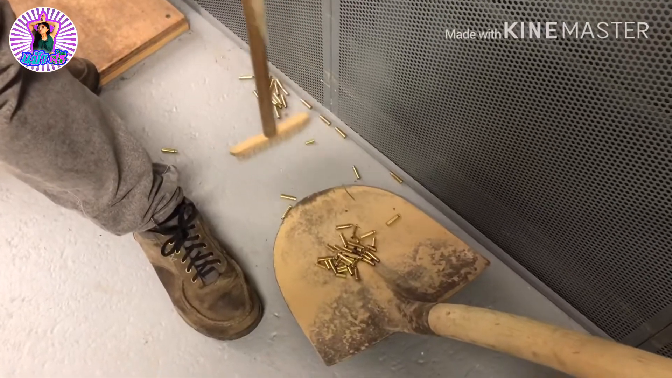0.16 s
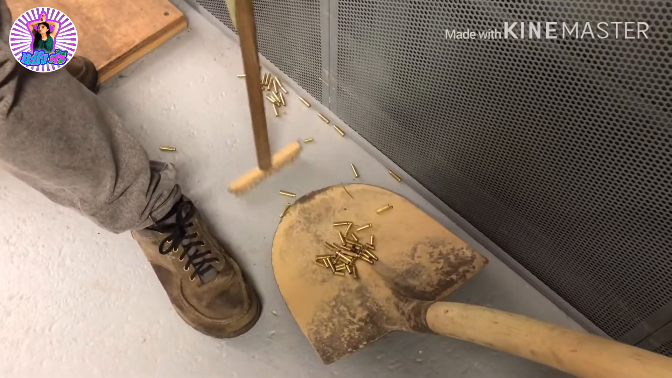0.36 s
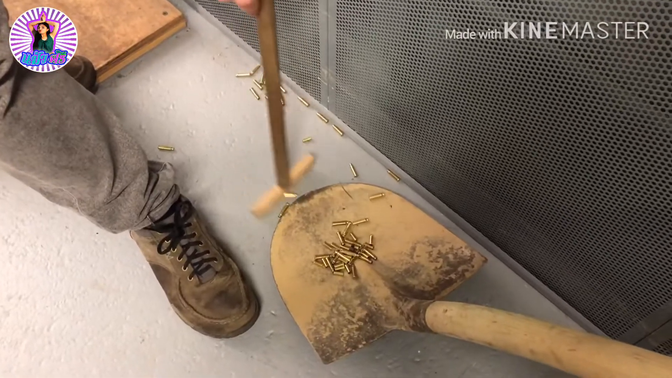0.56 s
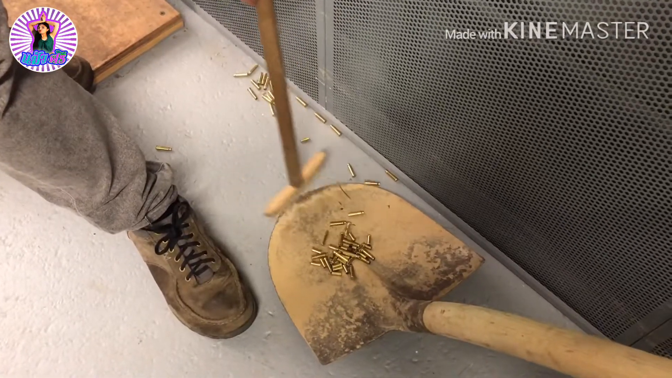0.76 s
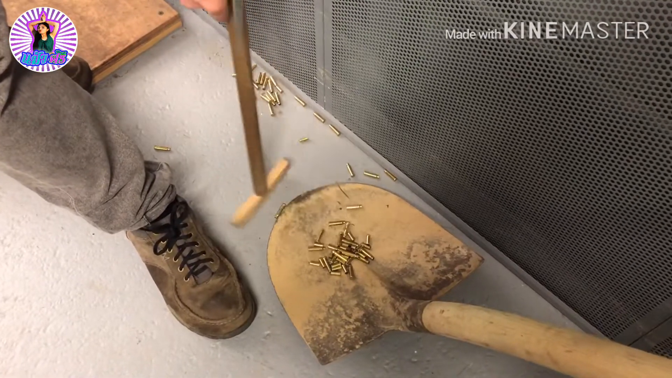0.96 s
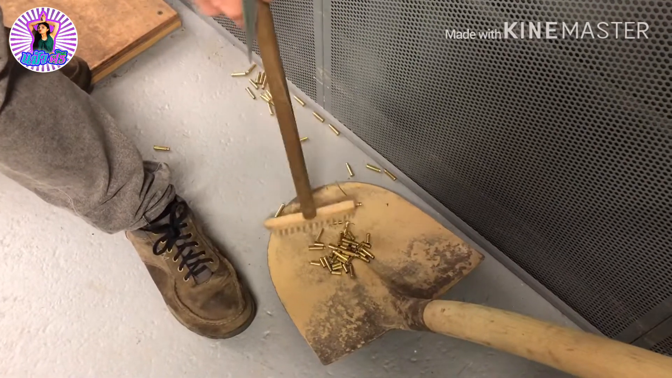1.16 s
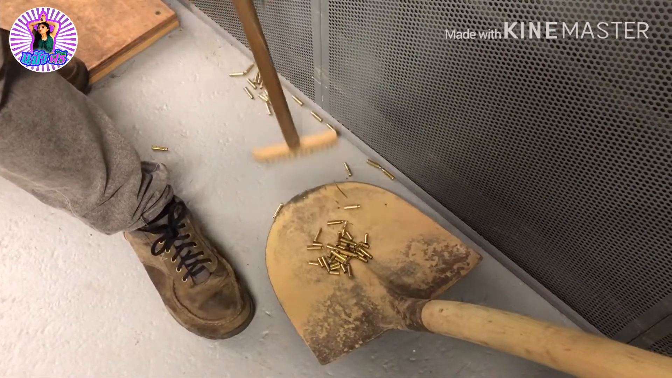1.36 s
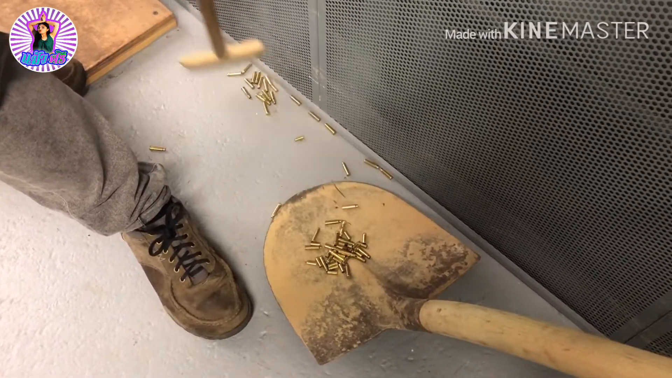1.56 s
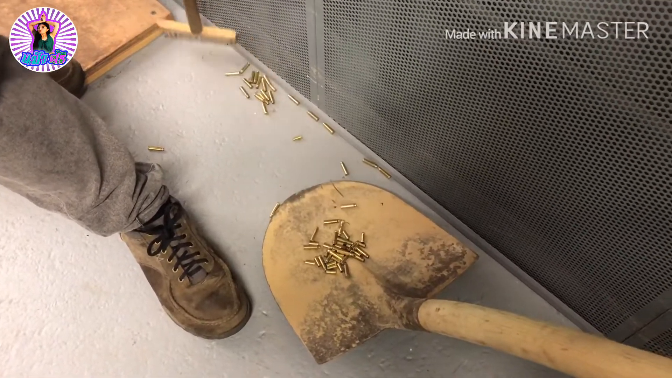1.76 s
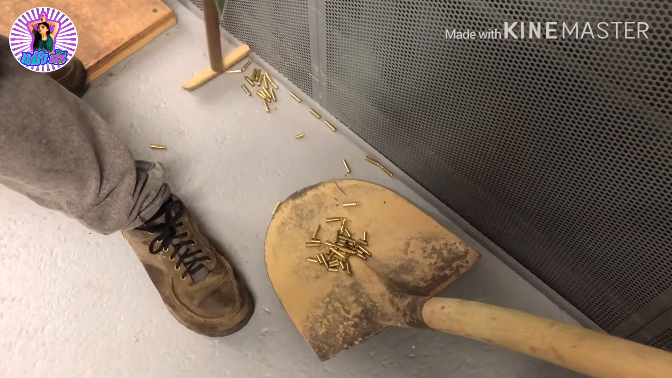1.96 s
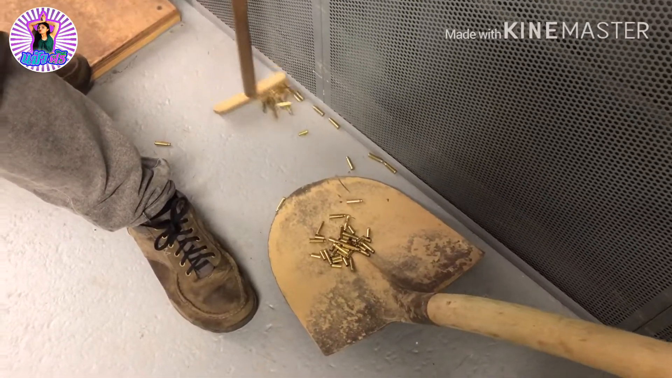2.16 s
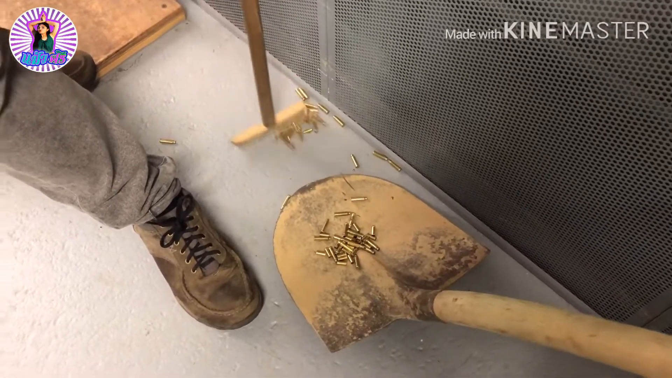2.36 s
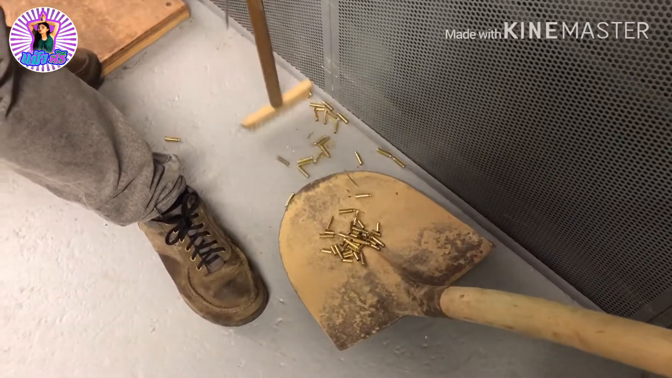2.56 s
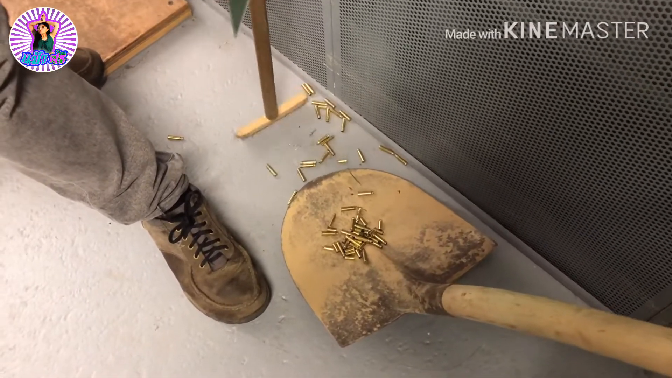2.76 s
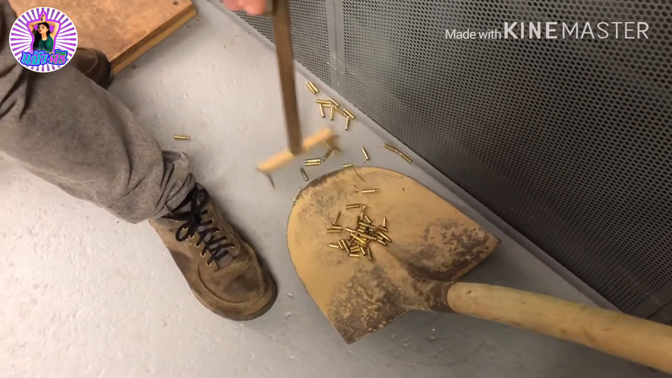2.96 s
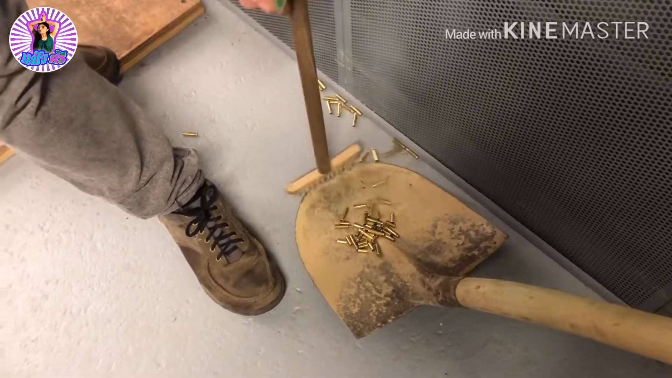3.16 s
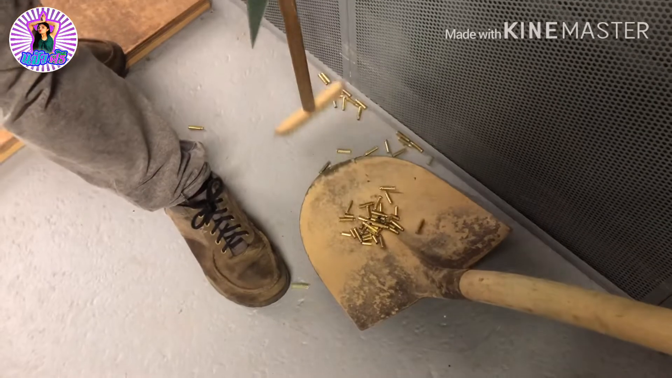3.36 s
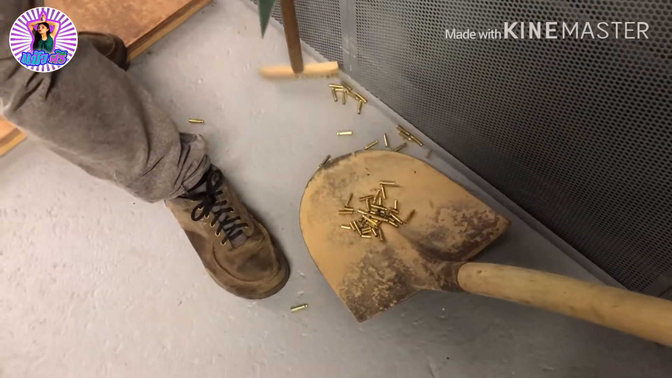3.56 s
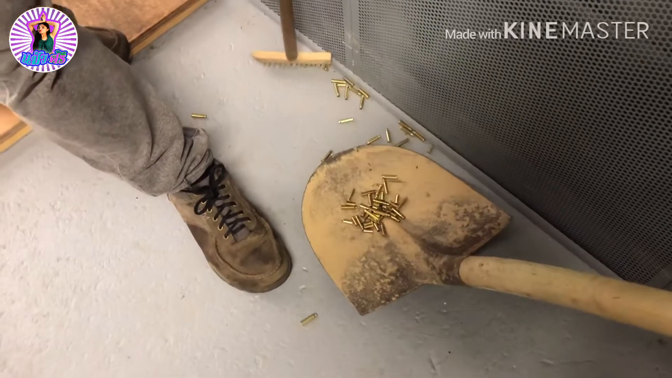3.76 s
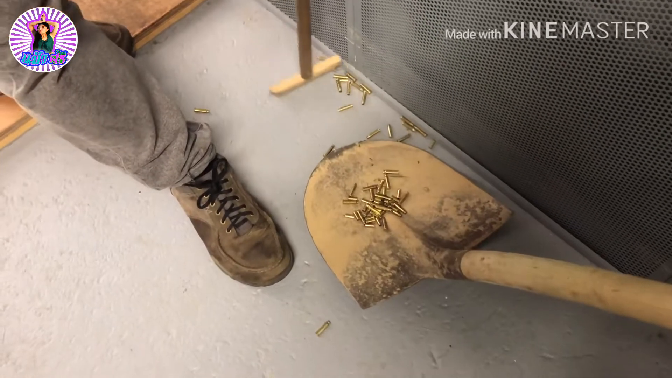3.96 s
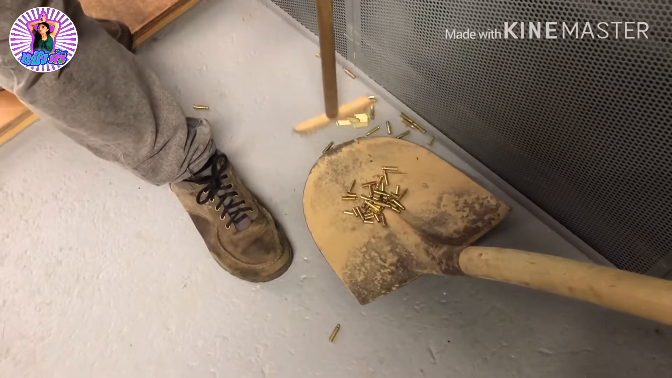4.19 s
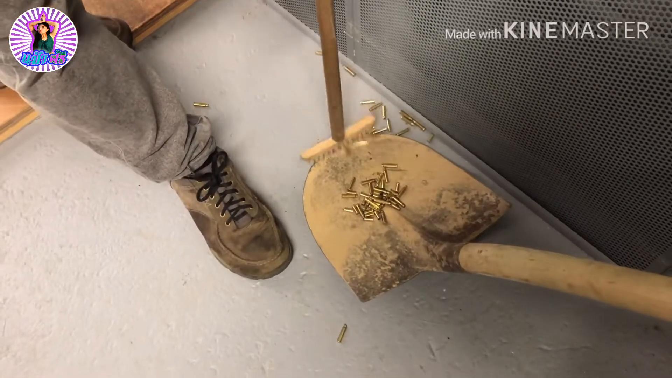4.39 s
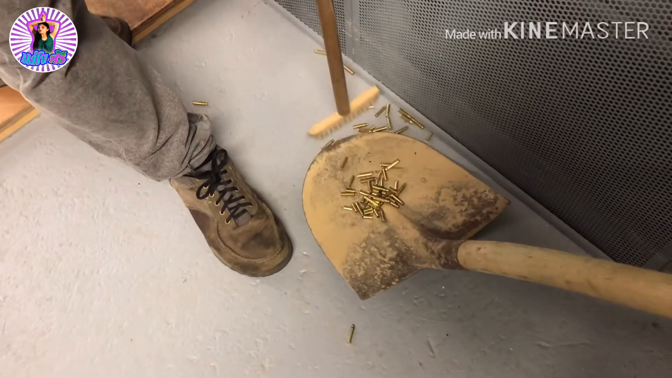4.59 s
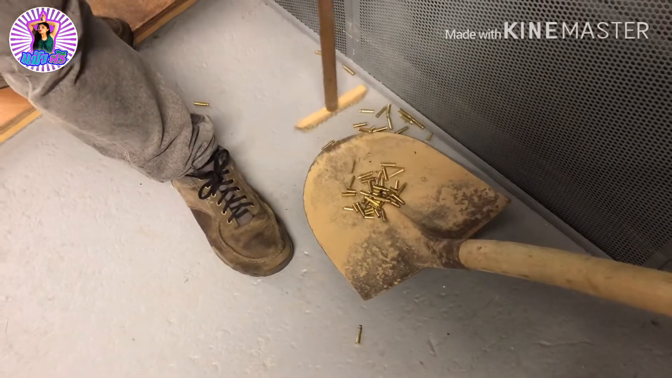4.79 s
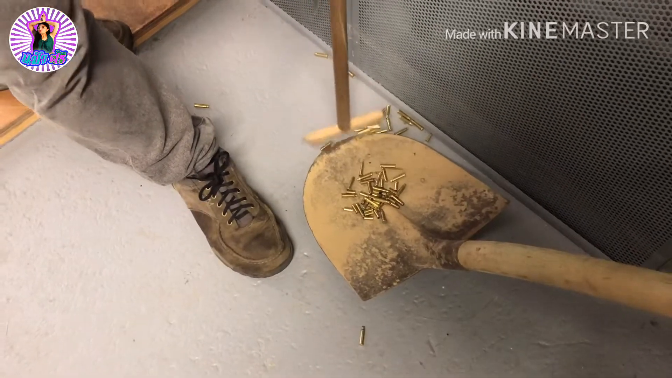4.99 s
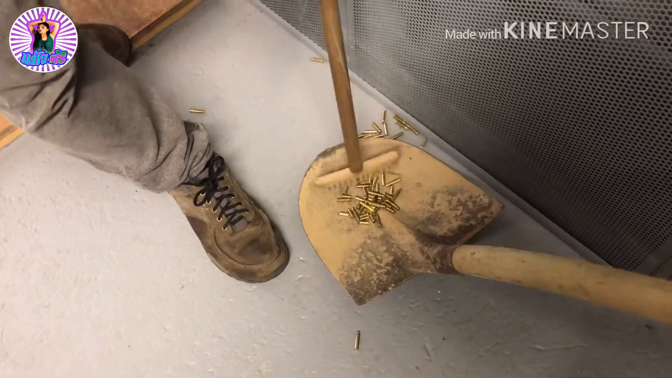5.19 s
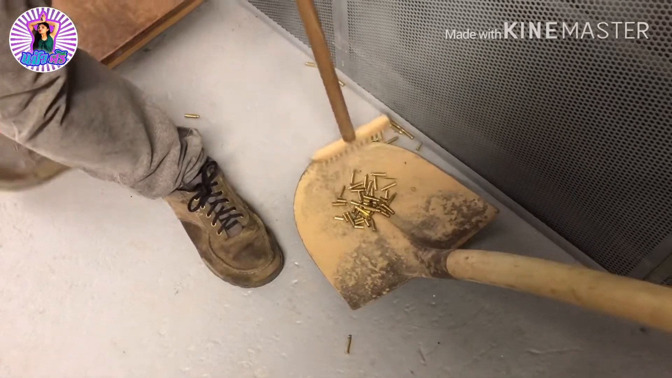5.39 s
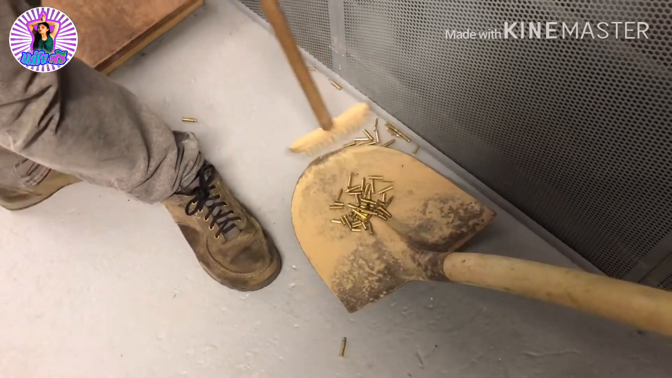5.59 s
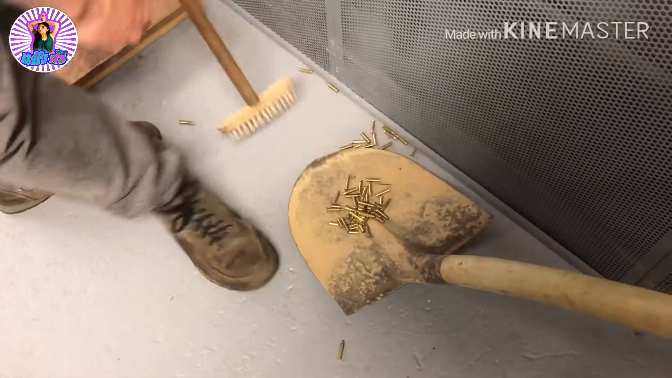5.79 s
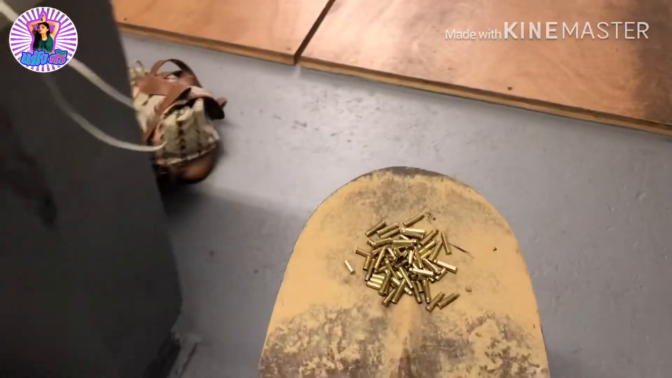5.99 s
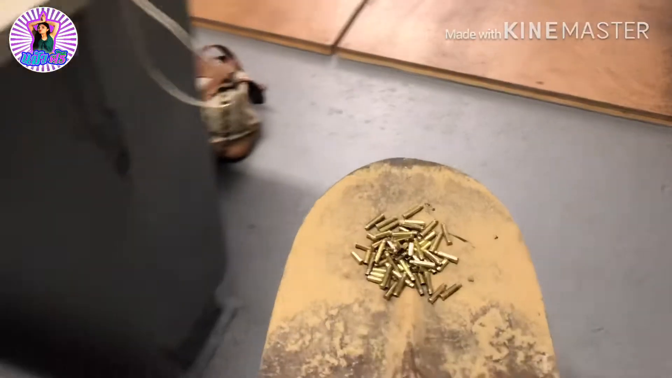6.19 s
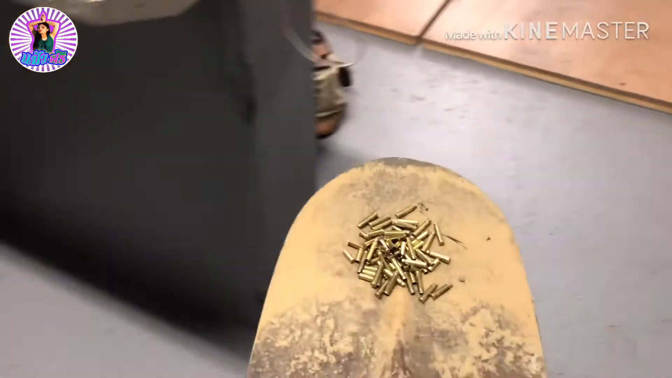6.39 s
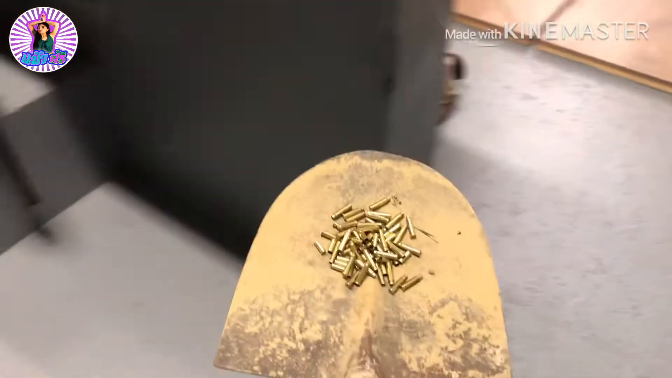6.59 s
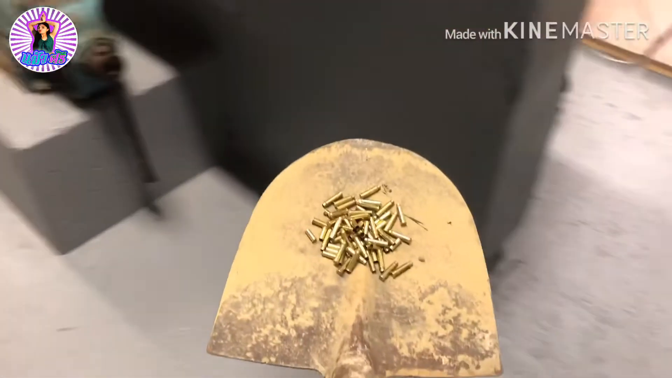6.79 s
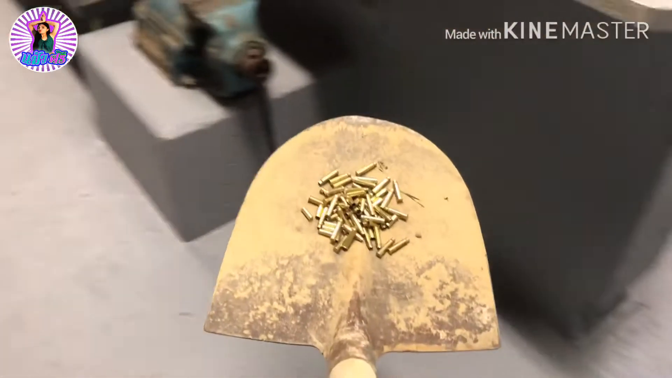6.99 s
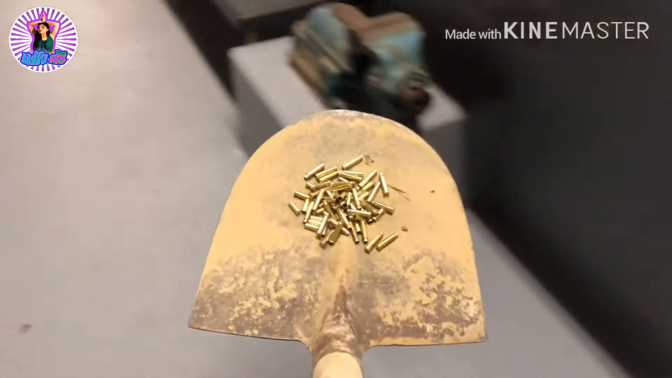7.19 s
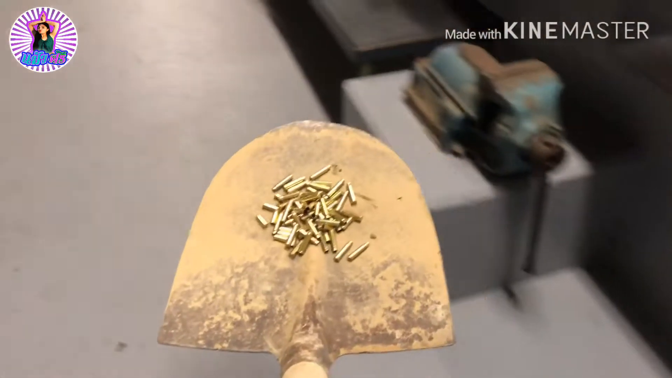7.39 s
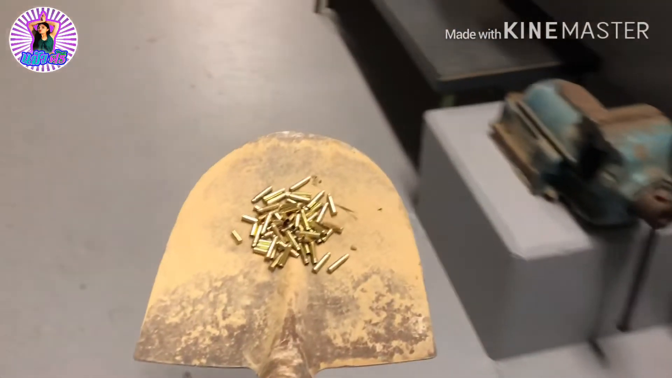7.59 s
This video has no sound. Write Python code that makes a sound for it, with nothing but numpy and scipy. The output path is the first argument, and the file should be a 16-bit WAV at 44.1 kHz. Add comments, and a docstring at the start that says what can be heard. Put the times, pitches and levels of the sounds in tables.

```python
"""Indoor range: fan harmonics and coloured noise hum while brass casings tinkle and clatter on a steel shovel.
A small broom sweeps them over painted concrete: noisy bristles brush, and casings ring as decaying sines.
The broom head bumps the wall in noise thuds and judders along it in grains; shoe scuffs follow as thuds too.
Dull knocks, also noise thuds, are scattered throughout. After a short silent break the loaded shovel is
carried away in quieter air, with soft steps."""
import sys
import numpy as np
from scipy import signal
from scipy.fft import rfft, irfft, next_fast_len
from scipy.io import wavfile
from scipy.ndimage import uniform_filter1d, minimum_filter1d, map_coordinates

SR = 44100
rng = np.random.default_rng(int(sys.argv[2]) if len(sys.argv) > 2 else 0)


def bounce(signal):
    """Save signal as a 16-bit WAV file at the path given by the first command-line argument."""
    frames = np.transpose(np.atleast_2d(signal))
    limited = np.clip(frames, -1, 1)
    pcm = np.round(limited * 32767).astype(np.int16)
    wavfile.write(sys.argv[1], SR, pcm)


N = 337355
TOP_HZ = 16000  # upper edge of the sound


def amp(db):
    """Decibels to gain."""
    return 10 ** (np.asarray(db) / 20)


def unit(x):
    """Scale to rms 1."""
    return x / np.sqrt(np.mean(x ** 2) + 1e-20)


def along(points, hz):
    """(frequency [Hz], value) points read on a log frequency axis."""
    f, v = np.transpose(points)
    return np.interp(np.log(hz + 1), np.log(f + 1), v)


def fade(t, t60):
    """Exponential decay that loses 60 dB in t60 seconds."""
    return 1000.0 ** (-t / t60)


def filtered(x, response):
    """Shape x by a gain that depends on frequency."""
    size = next_fast_len(len(x) + SR // 4)
    hz = np.fft.rfftfreq(size, 1 / SR)
    return irfft(rfft(x, size) * response(hz), size)[:len(x)]


def noise(spectrum, size=N):
    """Coloured noise of rms 1."""
    return unit(filtered(rng.standard_normal(size), lambda hz: amp(along(spectrum, hz))))


def grains(rate, spread_db):
    """Random tiny impacts, on average rate a second, of uneven size and either sign."""
    present = rng.random(N) < rate / SR
    return present * rng.choice([-1, 1], N) * amp(spread_db * rng.standard_normal(N))


def add(track, s, sound):
    """Mix a sound into the track at time s."""
    start = max(round(s * SR), 0)
    track[start:start + len(sound)] += sound[:max(len(track) - start, 0)]


def wobble(rate):
    """A smooth random curve, rate knots a second."""
    knots = rng.standard_normal(int(N * rate / SR) + 4)
    return map_coordinates(knots, [np.arange(N) * rate / SR])


def patchy(x, depth_db):
    """Random swells and dips of colour, a few hundred Hz wide and some 50 ms long."""
    z = signal.stft(x, nperseg=512)[2]
    field = uniform_filter1d(rng.standard_normal(z.shape), size=6, axis=0)
    field = uniform_filter1d(field, size=9, axis=1)
    return signal.istft(z * amp(depth_db * unit(field)), nperseg=512)[1][:N]


def ripple(hz, spacing_hz=170):
    """Random peaks and valleys along frequency, as seen from one spot of a plate."""
    return map_coordinates(rng.standard_normal(int(SR / spacing_hz)), [hz / spacing_hz])


def pushes(rows, rise, t60):
    """Gain curve of broom movements: each speeds up over a share of its length, holds and dies away."""
    t = np.arange(N) / SR
    total = np.zeros(N)
    for s, length, db in rows:
        speed_up = np.sin(np.pi / 2 * np.clip((t - s) / (rise * length), 0, 1))
        total += amp(db) * speed_up * fade(np.maximum(t - s - length, 0), t60)
    return total


def thuds(rows, octaves, t60, knock_db=-7, attack=0.0013):
    """Soft, heavily damped contacts: decaying noise around one broad resonance each."""
    out, t = np.zeros(N), np.arange(SR // 3) / SR
    for s, db, pitch_hz in rows:
        def resonance(hz):
            return 1 / (1 + (np.log2((hz + 1) / pitch_hz) / octaves) ** 2 / 2) ** 3
        body = unit(filtered(rng.standard_normal(len(t)), resonance))
        add(out, s, amp(db + knock_db) * body * fade(t, t60) * (1 - np.exp(-t / attack)))
    return out


# fan harmonics: (multiple of the pitch, rms level at zero swell [dB], share of the swell followed)
FAN_HARMONICS = [(1, -52.5, 1), (2, -63, .4)]
# swell of the drone, all but gone after the break: (time [s], level [dB])
DRONE_SWELL = [(0, -30.5), (2, -1.5), (3.6, -5), (4.7, 1.5), (5.95, 0.5), (6.05, -39)]
# moving air of the range: (frequency [Hz], relative level [dB per Hz])
AIR_COLOUR = [(18, -22), (32, -8), (58, 16), (130, 13), (250, 4), (500, -2), (1000, -6.5), (2500, -12.5),
              (6000, -19.5), (15000, -28)]
# air of the spot where the shovel is carried: (frequency [Hz], relative level [dB per Hz])
CARRY_AIR_COLOUR = [(20, -30), (42, -13.5), (62, -2), (95, -10), (200, -9.5), (350, -16), (700, -22),
                    (2400, -27), (15000, -44.5)]
# the silent break: (start [s], end [s])
SILENCE = (5.965, 6.04)
FAN_HZ = 101.2
AIR_DB, CARRY_AIR_DB = -57, -66  # rms before and after the break


def ventilation(waver_hz=2.2, waver_db=2.0):
    """Broadband moving air, and the unsteady harmonics of a fan; both are quieter after the break."""
    t = np.arange(N) / SR
    phase = 2 * np.pi * np.cumsum(FAN_HZ + waver_hz * wobble(13)) / SR
    swell_db = np.interp(t, *np.transpose(DRONE_SWELL))
    drone = np.zeros(N)
    for k, db, share in FAN_HARMONICS:
        level = amp(db + share * swell_db + waver_db * wobble(21))
        drone += level * np.sqrt(2) * np.sin(k * phase)
    range_air = amp(AIR_DB) * noise(AIR_COLOUR)
    carry_air = amp(CARRY_AIR_DB) * noise(CARRY_AIR_COLOUR)
    return drone + np.where(t < SILENCE[1], range_air, carry_air)


# modes of a casing, the air in its mouth and then its wall, before random variation:
# (frequency [Hz], level [dB], t60 [s], relative pitch spread between tubes)
CASING_MODES = [(2650, -9, .04, .06), (8600, -11, .02, .22), (12520, -18, .1, .006), (13940, 0, .13, .005)]


def casing(t, tick_db):
    """One contact of a brass tube: a dry tick and its very high ring, each tube a little different."""
    ring = np.zeros(len(t))
    for hz, db, t60, spread in CASING_MODES:
        gain = amp(db + rng.uniform(-2, 2))
        ring += gain * np.sin(2 * np.pi * hz * rng.normal(1, spread) * t) * fade(t, t60)
    tick = noise([(1200, -31.0), (2600, -1.0), (4000, -3.5), (8500, 2.0), (15000, -3)], size=len(t))
    return ring + amp(tick_db) * tick * fade(t, .008)


# single casings striking the floor or each other: (time [s], relative level [dB])
SINGLE_CLINKS = [(.0024, -15), (.0278, -17.5), (0.1927, -31), (0.3527, -37), (.7733, -16), (.9437, -34.5),
                 (.952, -32), (1.014, -33.5), (2.2016, -17.5), (2.5218, -22), (2.6312, -30), (3.137, -20),
                 (3.2424, -14), (3.2762, -12), (3.8023, -24.5), (4.2348, -16.5), (4.6678, -27),
                 (5.0902, -21), (5.2505, -20)]
# the broom shoves a heap of casings, which tumble ahead of it and roll out:
# (time [s], length of the shove [s], relative level [dB])
HEAP_SHOVES = [(2.185, 0.17, -32.5), (3.74, .05, -52.5), (4.17, .25, -37)]
SHOVE_RISE, ROLL_T60 = 0.14, 0.76  # share of a shove spent speeding up; rolling out [s]


def casings(clink_db=-6, tumble_db=-3, count=1100):
    """Single clinks, and a shower of small contacts while the heap is pushed along and rolls out."""
    t = np.arange(SR // 6) / SR
    single, shower = np.zeros(N), np.zeros(N)
    push = pushes(HEAP_SHOVES, SHOVE_RISE, ROLL_T60)
    for s, db in SINGLE_CLINKS:
        add(single, s, amp(db) * casing(t, tick_db=-5.5))
    times = (np.arange(count) + 2 * rng.random(count)) / 200  # about 200 contacts a second
    sizes = amp(rng.normal(0, 4, count)) * push[(times * SR).astype(int)]
    moving = sizes > amp(-64)  # skip contacts too faint to matter
    for s, size in zip(times[moving], sizes[moving]):
        add(shower, s, size * casing(t, tick_db=0.0))
    return amp(clink_db) * single + amp(tumble_db) * shower


# distinct blows of casings and broom head on the blade: (time [s], relative level [dB])
BLADE_BLOWS = [(.0034, -14), (.0305, -11.5), (.0471, -13), (.0604, -16), (.1735, -13.5), (.2250, -19.5),
               (.3634, -13.5), (.3875, -30), (.692, -9.5), (.7015, -3), (.707, -5.5), (.7134, -5),
               (.7567, -10), (.7684, -17.5), (.803, -18.5), (.83, -19), (1.166, -31), (3.0145, -28),
               (3.1607, 6), (3.171, -5), (3.1841, -2), (3.243, -5), (3.2574, -2.5), (3.3014, -12.5),
               (3.3258, -14.5), (3.3663, -9.5), (3.387, -9.5), (3.4192, -21.5), (3.4488, -18),
               (3.694, -28.5), (4.3881, -25), (4.42, -12.5), (4.4365, -1.5), (4.4431, 2), (4.46, -12.5),
               (4.4877, -15), (4.5042, -2), (4.5849, -4.5), (4.5905, -2), (4.6674, -12), (4.7015, -25),
               (4.7476, -28), (4.784, -21), (4.8255, -31), (4.8331, -26), (4.8561, -13.5), (4.8928, -25),
               (5.1124, -2), (5.1243, 0), (5.1344, -3), (5.2153, -13), (5.2345, -10.5)]
# each sweep lands a load of casings on one spot of the blade, and they rattle until they settle:
# (time [s], settling time [s], relative rattle level [dB], body pitch of the spot [Hz],
# treble setting of a 0 dB blow [dB], t60 of the damping by floor and broom [s])
CASING_LOADS = [(0, 0.41, -33.5, 1620, -5, 0.95), (.69, .38, -26.5, 1480, 2.5, 1.2),
                (3.161, .55, -26, 2090, 4, 3.4), (4.39, 0.61, -29.5, 1780, -0.5, 0.86),
                (5.11, .2, -27.5, 1800, -3, 0.28)]
SETTLE_DB = 15.5  # the rattle weakens by this much while a load settles
BRIGHTENING = 0.76  # rise of the treble setting for each dB of force


def contacts(scatter_db=3, count=12):
    """Yield blows and random rattle: (time [s], level [dB], treble [dB], spot [Hz], damping t60 [s])."""
    hits = list(BLADE_BLOWS)
    for s, settle_s, db, *_ in CASING_LOADS:
        progress = (np.arange(count) + rng.random(count)) / count
        levels = db - SETTLE_DB * progress + scatter_db * rng.standard_normal(count)
        hits += zip(s + settle_s * progress, levels)
    starts = [load[0] for load in CASING_LOADS[1:]]
    for s, db in hits:
        load = CASING_LOADS[np.searchsorted(starts, s + .01)]  # a blow just ahead of a load belongs to it
        *_, spot_hz, treble_db, damping_t60 = load
        yield s, db, treble_db + BRIGHTENING * db, spot_hz, damping_t60


# the blade's clearest modes: (frequency [Hz], relative level [dB], t60 before contact damping [s])
BLADE_MODES = [(1229, -15, 1.3), (1420, -6, 0.23), (1500, -12, 0.41), (1633, -4.5, 0.36), (1810, -7, .35),
               (1934, -5, 0.075), (2050, -10, 0.11), (2640, -8, 0.46), (3200, -13, 0.7), (3490, -13, .45),
               (3580, -9.5, 0.12), (4720, -14.5, 0.29), (6580, -15, 0.078), (8500, -14, .2),
               (9400, -9.5, .18), (11019, -13.5, 0.2)]
# colour of a blow on the blade: (frequency [Hz], relative level [dB per Hz])
STEEL_COLOUR = [(150, -41), (500, -29.5), (900, -20.5), (1250, -4.5), (1750, 2), (2900, -3), (3500, 1),
                (6000, -3), (11000, -4.5), (15500, -8.5)]


def blade(crack_db=-9, plate_db=-12.5, plate_t60=0.09, ring_db=-29, even_treble_db=-5, tilt=0.83,
          spot_db=7.0, spot_octaves=0.14, count=190):
    """Each blow cracks, then spreads into the steel's crowded modes; a few of them ring on."""
    t = np.arange(SR * 2 // 3) / SR
    crowd_hz = (np.arange(count) + 1 + rng.random(count)) * TOP_HZ / count  # a plate's modes are evenly spread
    crowd_gain = unit(amp(along(STEEL_COLOUR, crowd_hz))) * np.sqrt(2 / count)
    clear_hz, clear_db, clear_t60 = np.transpose(BLADE_MODES)
    hz = np.r_[crowd_hz, clear_hz]
    gain = np.r_[amp(plate_db) * crowd_gain, amp(ring_db + clear_db)]
    t60 = np.r_[plate_t60 * (crowd_hz / 4000) ** -.15, clear_t60]
    modes = np.sin(2 * np.pi * hz[:, None] * t) * fade(t, t60[:, None])
    out = np.zeros(N)
    for s, db, treble_db, spot_hz, damping_t60 in contacts():
        def colour(f):
            # hard contacts are brighter, and the spot has its own body pitch
            hardness = along([(2000, -0.25), (9000, 0.2), (14000, 0.59)], f)
            body = np.exp(-(np.log2((f + 1) / spot_hz) / spot_octaves) ** 2)
            return amp(tilt * (treble_db - even_treble_db) * hardness + spot_db * body)
        # the spot lies near the crests of some groups of modes and the nodes of others
        groups = unit(amp(4.5 * ripple(crowd_hz)))
        shape = np.r_[groups, np.ones(len(BLADE_MODES))] * rng.choice([-1, 1], len(hz))
        ring = (gain * colour(hz) * shape) @ modes
        burst = noise(STEEL_COLOUR, size=SR // 8)
        crack = filtered(burst, lambda f: colour(f) * np.interp(f, crowd_hz, groups))
        add(ring, 0, amp(crack_db) * crack * fade(t[:SR // 8], .027))
        onset = 1 - np.exp(-t / 0.0004)
        add(out, s, amp(db) * ring * fade(t, damping_t60) * onset)
    return out


# strokes of the bristles over the floor, the faint ones at 2.82 and 3.86 s on the way back: # (time [s], length
# [s], relative level [dB])
FLOOR_STROKES = [(.497, .025, -50), (.57, .12, -48.5), (1.05, 0.074, -51), (1.16, 0.035, -38),
                 (1.47, .07, -67.5), (1.8, .2, -50.5), (2.03, .47, -46), (2.765, .03, -56.5),
                 (2.82, .13, -60.5), (2.93, 0.32, -45.5), (3.67, 0.21, -50), (3.86, .17, -59.5),
                 (4.02, 0.49, -46.5), (4.94, 0.13, -55.5)]
# colour of the bristles on the floor: (frequency [Hz], relative level [dB per Hz])
BRISTLE_COLOUR = [(410, -43), (700, -34.5), (968, -18), (1190, -8), (1360, -10), (1650, -7.5), (1970, -7),
                  (3190, -3), (4770, -8), (5360, -4), (7800, -14.5), (8880, -10.5), (15500, -12)]
# bristles dragged over the lip of the blade: (centre time [s], half-width [s], relative level [dB])
LIP_BRUSHES = [(0.515, .015, -47), (0.64, .06, -53), (1.068, 0.083, -62), (1.184, 0.016, -42.5),
               (2.792, 0.012, -57), (3.04, 0.031, -60), (3.509, 0.062, -58), (5.11, 0.069, -47.5)]
STROKE_RISE, STROKE_T60 = 0.3, 0.081  # share of a stroke spent speeding up; dying away [s]


def bristles(floor_db=0, lip_db=3, sing_db=-3):
    """Tips flick over the floor in tufts and catch on grit; on the shovel's lip they make the steel sing."""
    tufts = unit(grains(9000, spread_db=3)) * amp(1.3 * wobble(70))
    grit = amp(-7) * unit(grains(110, spread_db=4))
    hiss = filtered(tufts + grit, lambda hz: amp(along(BRISTLE_COLOUR, hz)))
    hiss = unit(patchy(hiss, depth_db=2.2))
    floor = hiss * pushes(FLOOR_STROKES, STROKE_RISE, STROKE_T60)

    t = np.arange(N) / SR
    pressure = sum(amp(db) * np.exp(-((t - s) / length) ** 2) for s, length, db in LIP_BRUSHES)
    flicks = unit(grains(2000, spread_db=4))
    scratch = unit(filtered(flicks, lambda hz: amp(along(STEEL_COLOUR, hz)))) * pressure
    short_t = t[:SR // 2]
    ring = np.zeros(len(short_t))
    for hz, db, t60 in BLADE_MODES:
        ring += amp(db) * np.sin(2 * np.pi * hz * short_t) * fade(short_t, t60 / 2)  # half the blade's t60
    sing = signal.fftconvolve(flicks * pressure, ring / np.linalg.norm(ring))[:N]
    return amp(floor_db) * floor + amp(lip_db) * scratch + amp(sing_db) * sing


# dull knocks of the broom and the shovel handle: (time [s], relative level [dB], pitch [Hz])
HANDLE_KNOCKS = [(.705, -22.5, 1145), (1.19, -36, 1137), (2.77, -36, 2100), (5.498, -44.5, 1890),
                 (6.74, -50.5, 1190), (7.262, -40.5, 990), (7.347, -40.5, 950), (7.464, -36.5, 945),
                 (7.495, -35.5, 450), (7.564, -49, 2000)]
# short scuffs of a shoe: (time [s], relative level [dB], pitch [Hz])
SHOE_SCUFFS = [(5.385, -40.5, 516), (5.575, -37.5, 680), (5.61, -40.5, 750), (5.718, -30, 520)]
# soft steps: (time [s], relative level [dB], pitch [Hz])
SOFT_STEPS = [(6.73, -37.5, 166.8), (7.535, -37, 145)]


def knocks():
    """Handles knock, shoes scuff and step: damped thuds, the steps narrowest in band and longest."""
    handles = thuds(HANDLE_KNOCKS, octaves=1.3, t60=0.11)
    scuffs = thuds(SHOE_SCUFFS, octaves=0.76, t60=0.046)
    steps = thuds(SOFT_STEPS, octaves=0.29, t60=0.27)
    return handles + scuffs + steps


# the broom head bumps the wall and drags along it:
# (time [s], relative bump level [dB], relative drag level [dB], t60 of the drag [s])
WALL_BUMPS = [(1.774, -26.5, -34, 1.1), (2.17, -42.5, -49, 0.68), (3.602, -23, -36, 0.7)]
# colour of the hollow panel: (frequency [Hz], relative level [dB per Hz])
WALL_COLOUR = [(41, -49), (70, -21), (109, -3), (218, -4.5), (414, -11.5), (591, -13.5), (1330, -26.5),
               (1930, -21.5), (4000, -44), (5200, -39), (8800, -120)]
BUMP_HZ = 202


def wall(drag_db=-1):
    """The wooden broom head bumps the hollow wall panel and judders along it."""
    t = np.arange(N) / SR
    judder = unit(filtered(grains(900, spread_db=3), lambda hz: amp(along(WALL_COLOUR, hz))))
    drag = sum(amp(db) * (t > s) * fade(np.abs(t - s), t60) for s, _, db, t60 in WALL_BUMPS)
    bumps = thuds([(s, db, BUMP_HZ) for s, db, *_ in WALL_BUMPS], octaves=3.7, t60=0.098)
    return amp(drag_db) * judder * drag + bumps


# decay of the range's echo: (frequency [Hz], t60 [s])
ROOM_DECAY = [(150, 0.63), (1500, 0.22), (5000, 0.35), (14000, 0.2)]


def room(x):
    """The range's short, damped echo: a decaying noise tail that starts after 5 ms."""
    hz, t, z = signal.stft(rng.standard_normal(SR // 2), SR, nperseg=256)
    decay = fade(t, along(ROOM_DECAY, hz)[:, None])
    tail = signal.istft(z * decay, SR, nperseg=256)[1]
    echo = np.r_[np.zeros(SR // 200), tail / np.linalg.norm(tail)]
    return signal.fftconvolve(x, echo)[:N]


def scene():
    """All the work near the microphone, its echo and the ventilation."""
    work = blade() + casings() + bristles() + wall() + knocks()
    return (work + amp(-17) * room(work) + ventilation())[None]


def record(dry):
    """Fade out for the break and return; a fast limiter holds peaks at full scale; then the top is cut."""
    t = np.arange(N) / SR
    outside_break = np.maximum(SILENCE[0] - t, t - SILENCE[1])  # seconds away from the silence
    gate = np.clip(outside_break / 0.088, 0, 1) ** 0.51
    needed = 1 / np.maximum(np.abs(dry[0]), 1)
    limiter = uniform_filter1d(minimum_filter1d(needed, size=129), size=129)
    return filtered(dry[0] * gate * limiter, lambda hz: hz < TOP_HZ)[None]


dry = scene()
out = record(dry)
bounce(out)
```